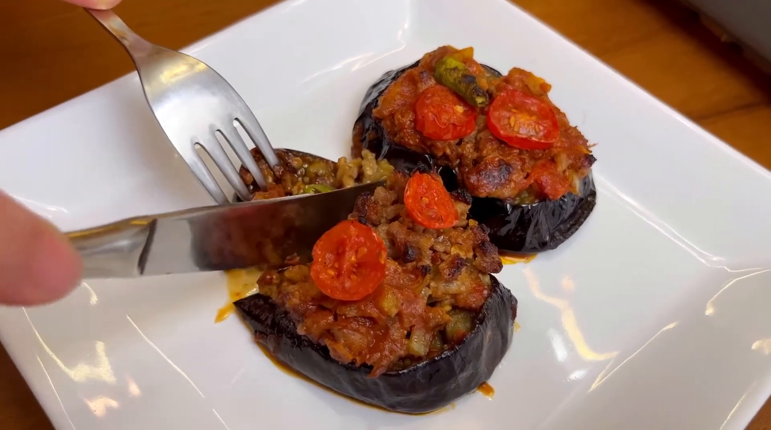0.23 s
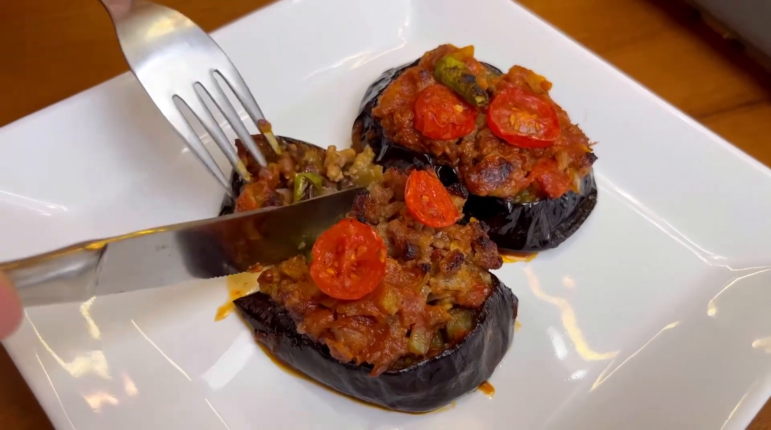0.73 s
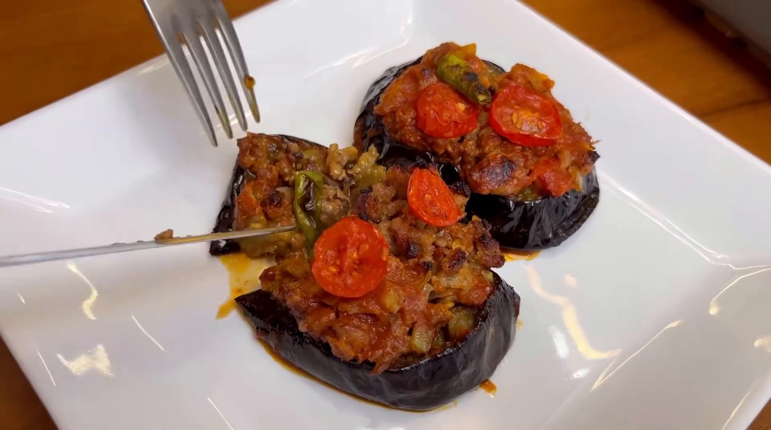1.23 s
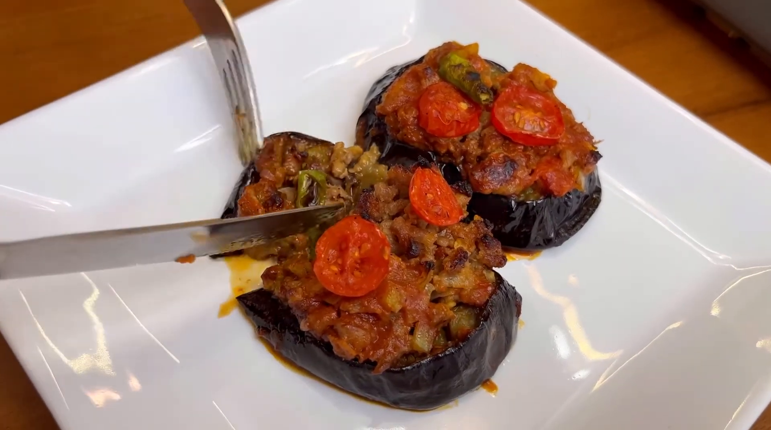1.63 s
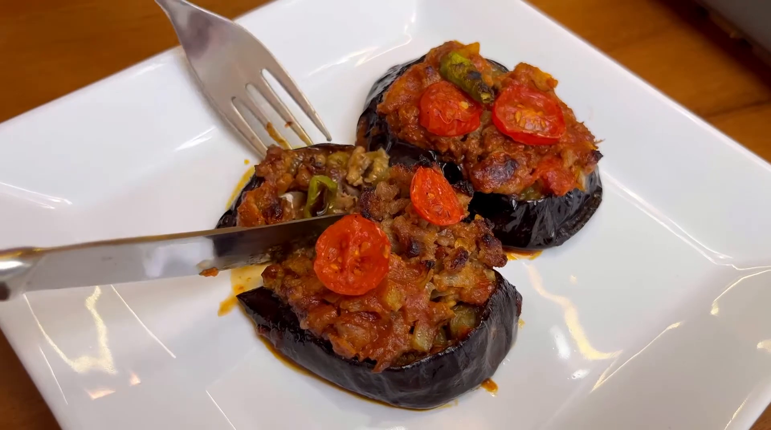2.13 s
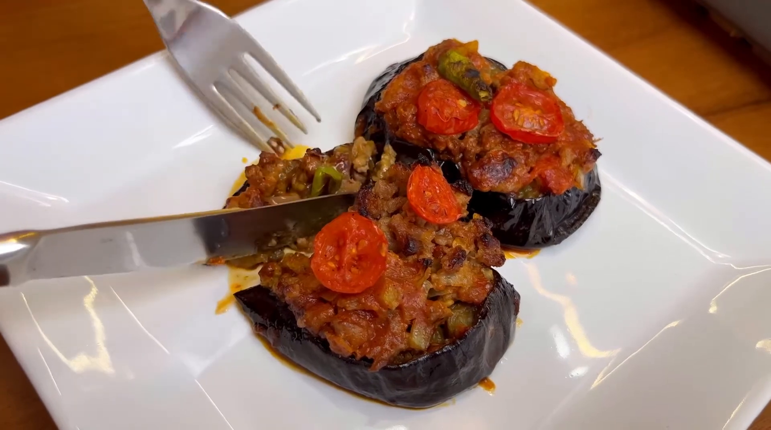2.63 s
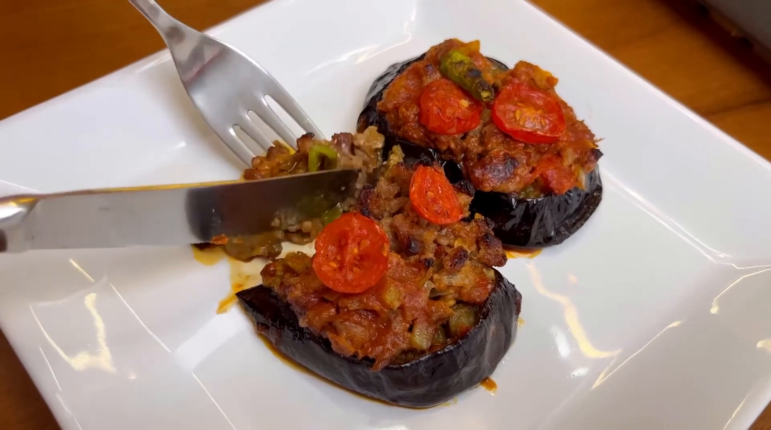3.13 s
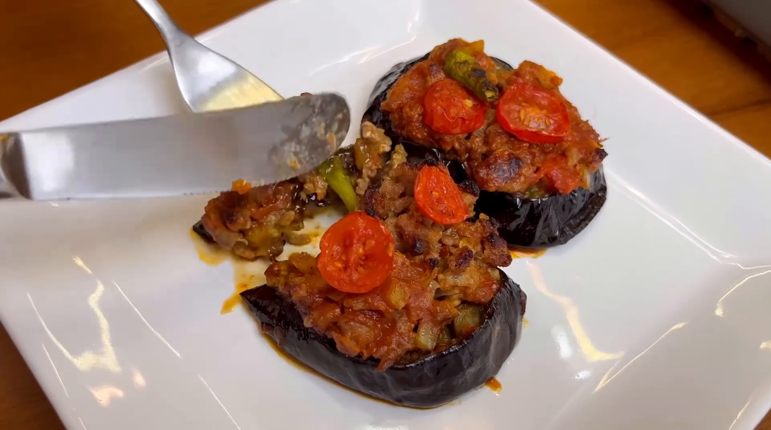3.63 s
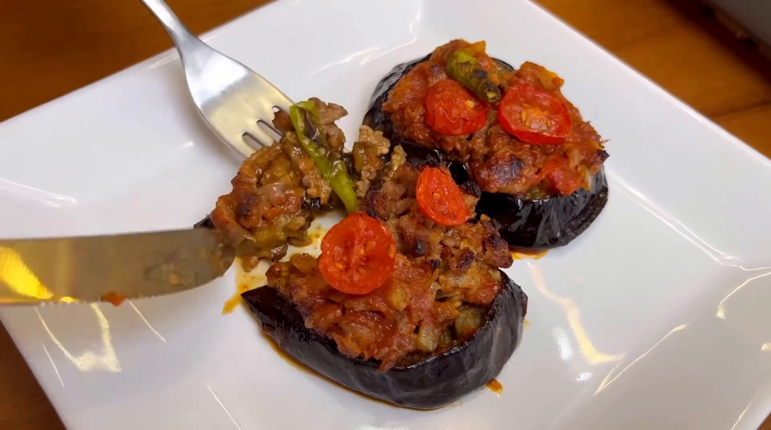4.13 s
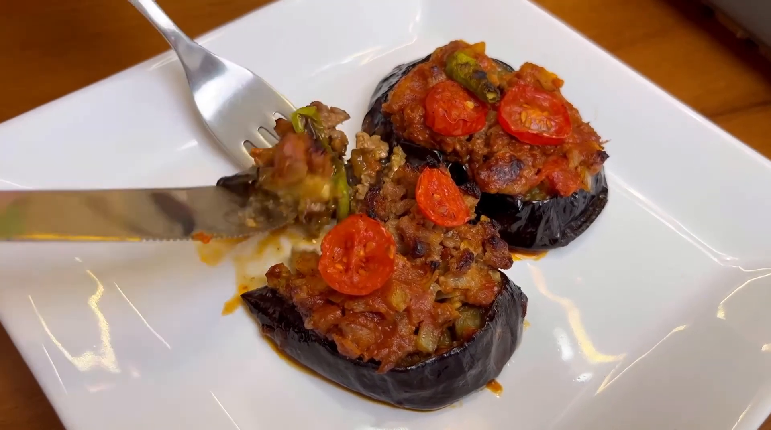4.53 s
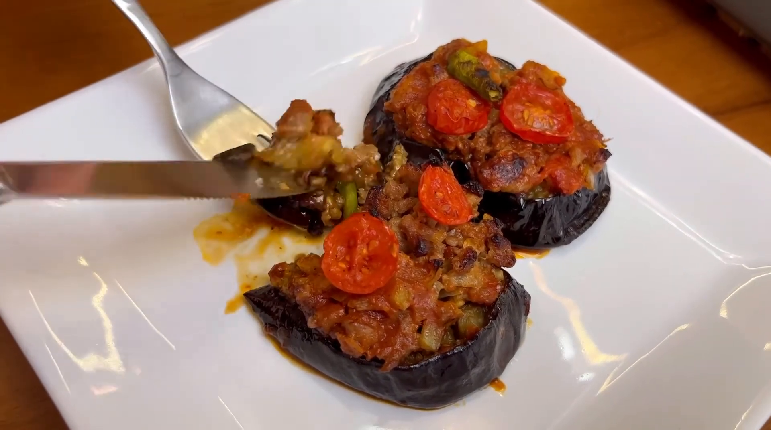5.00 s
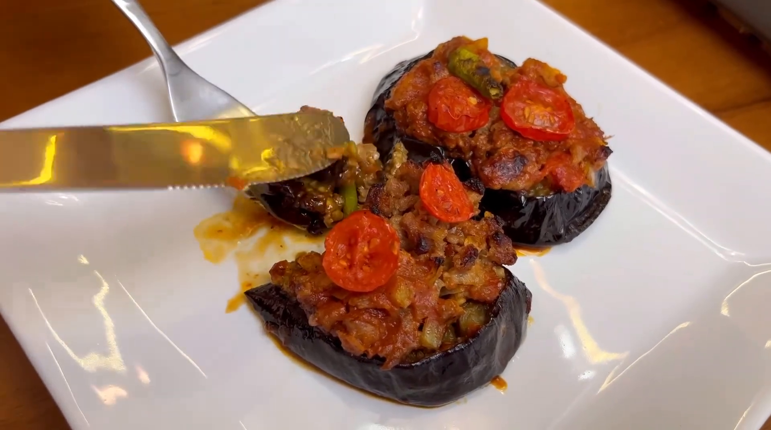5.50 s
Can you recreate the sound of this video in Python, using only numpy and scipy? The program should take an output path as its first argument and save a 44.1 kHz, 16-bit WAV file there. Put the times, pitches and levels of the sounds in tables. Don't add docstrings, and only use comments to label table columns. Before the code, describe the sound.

Steel cutlery on a plate of soft food, heard very near. Stuttering knife scrape and knock come first, then a pause, a quick fork squeak with a clink, sticky little snaps and a muffled saw stroke. The loudest event follows, a bright high ringing clink with a fast decay. Afterwards only tiny moist clicks over a distant low rumble and steady hiss in a quiet indoor room.

```python
import sys
import numpy as np
from scipy import signal
from scipy.fft import rfft, irfft, next_fast_len
from scipy.io import wavfile
from scipy.ndimage import uniform_filter1d, minimum_filter1d

SR = 44100
rng = np.random.default_rng(int(sys.argv[2]) if len(sys.argv) > 2 else 0)


def wav_record(signal):
    frames = np.transpose(np.atleast_2d(signal))
    bounded = np.clip(frames, -1, 1)
    quanta = np.round(bounded * 32767).astype(np.int16)
    wavfile.write(sys.argv[1], SR, quanta)


def field_ratio(decibels):
    return 10 ** (np.asarray(decibels, dtype=float) / 20)


N = 254008

KNIFE_HZ = [318, 587, 999, 1155, 1260, 1985, 2078, 2398, 2479, 2960, 3292, 3408, 3596, 4541, 4632, 4923,
            5181, 5292, 5696, 6105, 6239, 6498, 8390, 8662, 2549, 2828, 3159, 3258, 3358, 3525, 4233, 4873,
            5146, 5239, 5352, 5576, 7087, 7823]
FORK_HZ = [205, 322, 385, 452, 587, 996, 1157, 1529, 1776, 2078, 2261, 3219, 3359, 3474, 4368, 4939, 5211,
           5628, 5771, 6807, 7418, 7827, 9259, 9580, 9876, 10516, 11012, 11332, 11544, 11768, 2924, 3062,
           3284, 4771, 5362, 5542, 6407, 6512, 6955, 7215, 7284, 7651, 9103]
RIM_HZ = [248, 460, 587, 1155, 1300, 1527, 1615, 1986, 2078, 2213, 2549, 3467, 3610, 4363, 4802, 4931, 5206,
          5560, 5603, 5655, 6099, 6199, 7407, 7490, 7650, 8659, 8780, 10026, 11009, 11930, 3408, 3529, 3565,
          3772, 4044, 4194, 4465, 4665, 5257, 5344, 5508, 6591, 7211, 8391, 10166, 2929, 6800]
# level in dB, t60 in seconds.
KNIFE_RINGS = [(-50, 0.4), (-62.5, .16), (-51.5, 0.46), (-44, 0.24), (-41, 0.14), (-40.5, 0.088),
               (-43, 0.35), (-47.5, 0.19), (-44.5, 0.21), (-44.5, 0.17), (-39, 0.11), (-46, 0.32),
               (-47.5, 0.38), (-58, 0.2), (-61, 0.13), (-52, 0.176), (-51, 0.21), (-51.5, 0.19),
               (-63, 0.18), (-67.5, .18), (-66, 0.17), (-55, 0.12), (-67, 0.189), (-72, 0.08), (-47, .2),
               (-56.5, .2), (-52.5, .2), (-46.5, 0.3), (-43.5, .3), (-55.5, 0.13), (-61, .2), (-51.5, .2),
               (-58, .2), (-54, 0.17), (-57.5, .2), (-60, .2), (-72, .17), (-71.5, 0.19)]
FORK_RINGS = [(-55.5, 0.23), (-44.5, 0.79), (-52, 0.22), (-48.5, 0.24), (-49.5, 0.23), (-48.5, 0.28),
              (-39.5, 0.13), (-48.5, 0.12), (-52, .33), (-64, .32), (-62.5, .25), (-41.5, .12), (-38, .2),
              (-38, 0.23), (-42.5, 0.26), (-48, 0.46), (-40.5, 0.32), (-38, 0.28), (-40.5, 0.21),
              (-50, 0.062), (-42, 0.11), (-54, 0.25), (-45.5, .063), (-33.5, 0.043), (-56, 0.19),
              (-57, 0.21), (-49, 0.15), (-45.5, 0.14), (-44.5, .16), (-46.5, .17), (-59, .3), (-55, .3),
              (-48.5, .3), (-54.5, .3), (-55, .22), (-50, 0.25), (-55, .15), (-56.5, .2), (-57, .25),
              (-59.5, 0.18), (-53, .2), (-58.5, .22), (-54, 0.19)]
RIM_RINGS = [(-42, .16), (-41.5, .2), (-45, 0.16), (-34.5, 0.18), (-37, .25), (-39.5, 0.55), (-32, .15),
             (-27, .2), (-29.5, .2), (-24.5, 0.27), (-39, .41), (-25.5, .22), (-28, 0.18), (-28.5, .23),
             (-33.5, .15), (-22, .22), (-33.5, .16), (-29, 0.053), (-28.5, 0.15), (-25, .19), (-28.5, .19),
             (-34.5, .22), (-26, .2), (-33.5, 0.36), (-33.5, .16), (-39, 0.46), (-27, .23), (-37, .12),
             (-34, 0.21), (-50, 0.35), (-35, .25), (-32, .25), (-30, .25), (-39, .25), (-39, .35),
             (-40.5, .3), (-41.5, .3), (-45, .3), (-40, .28), (-43, .28), (-38, .25), (-37, .25),
             (-42.5, .22), (-44.5, .3), (-44.5, .25), (-51.5, .5), (-46.5, 0.25)]
# frequency in Hz, density in dB per Hz.
CRACKS = [
    [(120, -35), (200, -19), (704, -29), (1200, -4.5), (1670, -38), (2050, -3.5), (2750, -33.5), (3260, 7),
     (4150, -29.5), (5290, -15.5), (7330, -31), (10500, -35.5), (12300, -61), (16000, -100), (22000, -120)],
    [(120, -40.5), (200, 1.5), (1180, -14), (1610, -19.5), (2160, 8), (2790, -19), (3380, 4), (4010, -25.5),
     (4300, -0.5), (5660, -8), (7590, -9.5), (8420, -27), (12300, -3.5), (16000, -43), (22000, -120)],
    [(120, -48.5), (200, -16), (851, -21), (2120, -1.5), (2990, -21), (3500, -2), (3940, -19.5),
     (4850, -3.5), (6500, -17.5), (7460, -1.5), (8130, -19.5), (11300, -24), (12300, -38), (16000, -65.5),
     (22000, -120)],
]
# start in seconds, early ring in dB, early t60 in seconds, crack in dB.
KNOCKS = [
    (0.6236, 17.5, 0.028, -23.5),
    (2.579, 13, 0.041, -22.5),
    (4.217, -4.5, 0.062, -13),
]
# delay in seconds, level in dB.
BOUNCES = [
    (.004, 0.5),
    (.008, -4),
    (.0095, -1),
]
# time in seconds, pressure in dB, brightness in dB.
STROKES = [
    [(0.0, -43, -13), (0.045, -82, -22), (0.075, -59, -30), (0.114, -54.5, -27.5), (0.188, -72.5, -9),
     (0.222, -78.5, -29), (0.262, -66.5, -31), (0.298, -51.5, -19), (0.46, -89.5, -42)],
    [(2.7, -79.5, 6.5), (2.754, -83, -9.5), (2.862, -62.5, -18), (2.906, -78.5, -14), (2.946, -62, -30.5),
     (3.04, -102, 1)],
]
# frequency in Hz, width in Hz, level in dB.
PLATE = [(1190, 58, 6), (2008, 20, 4), (2515, 20, -2.5), (3150, 100, -2.5), (3438, 49, -8.5),
         (4617, 53, -15), (5200, 46, -11.5), (6760, 110, -13.5), (8300, 97, -21.5), (11300, 190, -27)]
SAUCE = [(2062, 110, -5), (3080, 120, -14.5), (4930, 27, -15.5), (7160, 74, -14.5), (8700, 94, -37),
         (9800, 88, -32), (9900, 24, -23), (11250, 67, -10)]
# time in seconds, level in dB, brightness in dB.
SKID = [(2.224, -76, -5), (2.236, -52, -5.5), (2.246, -46, -11.5), (2.264, -41.5, -22), (2.285, -47.5, -22),
        (2.31, -52, -24), (2.345, -65, -30), (2.42, -91, -38)]
# frequency in Hz, width in Hz, level in dB.
TINES = [(1341, 27, 1.5), (2412, 95, -2), (3020, 36, -8), (3760, 61, -3), (4114, 90, -2.5),
         (5430, 52, -12.5), (6140, 23, -24), (7250, 39, -22.5), (8400, 130, -16), (10950, 110, -33)]
# frequency in Hz, density in dB per Hz.
FRICTION_HISS = [(120, -25), (200, -5.5), (732, -11.5), (886, -3.5), (966, -6), (1360, -5), (1900, -9),
                 (2330, -5.5), (3990, -9), (12500, -34), (16200, -68), (22000, -120)]
# start in seconds, peak in dB, strongest ring in Hz.
NUDGES = [(0.001, -40, 3030), (0.0664, -56, 1290), (0.0877, -62, 2130), (0.1201, -45.5, 1190),
          (0.1181, -41, 2050), (0.164, -45, 1860), (0.2615, -55, 1199), (0.273, -55, 2000),
          (0.3013, -33, 1216), (0.3004, -54.5, 3070), (0.33, -51, 1256), (0.355, -53, 1290),
          (0.3694, -43, 2075), (2.83, -54.5, 1210), (2.859, -67, 2111), (2.939, -54, 2040)]
# start in seconds, peak in dB, pitch in Hz, top band in dB.
TICKS = [(0.158, -49, 9300, -80), (0.293, -65, 6900, -67.5), (0.536, -58, 6700, -93),
         (0.7197, -74, 5660, -80), (0.743, -75, 7600, -75), (0.755, -65, 7800, -88),
         (1.53, -95, 5430, -87.5), (2.1564, -66, 6520, -102), (2.189, -58, 6200, -99),
         (2.2193, -62, 6650, -98), (2.445, -43.5, 8200, -70), (2.458, -52, 8310, -78),
         (2.466, -74, 7500, -76), (2.4804, -64, 8300, -89), (2.4962, -50.5, 8000, -82),
         (2.5046, -52, 6860, -90), (2.5124, -62, 8210, -84), (3.033, -66, 7000, -100),
         (3.0407, -66, 7300, -100), (3.105, -44.5, 5950, -79), (3.249, -71.5, 5640, -88),
         (3.41, -83.5, 6170, -83), (3.4906, -72.5, 7740, -75.5), (3.506, -63, 6950, -77),
         (4.8094, -69, 8020, -85), (4.8792, -64, 7740, -68), (4.95, -53, 8700, -60.5),
         (4.9709, -48, 6530, -86), (5.6494, -72.5, 5690, -84)]
# start in seconds, peak in dB, pitch in Hz, top band in dB.
SMACKS = [(2.9529, -60.5, 7650, -99), (2.954, -75, 5050, -99), (2.99, -83, 8430, -86),
          (3.094, -78, 8060, -86), (3.1085, -70, 5200, -94)]
# frequency in Hz, t60 in seconds.
ROOM = [(250, 0.73), (1000, 0.3), (3000, 0.28), (6000, 0.24), (12000, 0.14)]
# frequency in Hz, lead in radians.
PORT_LEAD = [(300, 0.1), (1150, 0.6), (2070, 1.6), (3460, 3.9), (4920, 5.9), (6100, 9.4), (7400, 12.5),
             (11900, 18.8)]
# time in seconds, level in dB, hum frequency in Hz.
RUMBLE = [(0.0, -70, 63), (1.0, -58, 63), (2.0, -67, 64), (2.75, -62, 68), (3.3, -64, 62),
          (3.75, -56.5, 69.5), (4.8, -64, 70.5), (5.76, -59.5, 72)]
# frequency in Hz, level in dB.
AIR = [(56, -40), (95, -12), (101, -23), (129, -2.5), (167, -7), (201, -1.5), (283, -8), (327, -9.5),
       (677, -17), (1450, -16.5), (1650, -22), (3150, -35), (5500, -38.5), (12000, -58), (15600, -89),
       (22000, -120)]
# frequency in Hz, width in Hz, level in dB.
BOOMS = [(140, 14, 6), (205, 12, 7), (240, 14, 6), (322, 12, 6), (1100, 500, 3), (11200, 1000, 9),
         (9600, 900, -8)]
# frequency in Hz, correlation from 0 to 1.
SAME = [(60, 0.98), (150, 0.85), (360, 0.6), (870, 0.15), (2120, 0.3), (5170, 0.17), (12600, 0.1)]

LEAD = 0.03


def evened(x):
    return x / np.sqrt(np.mean(x ** 2) + 1e-20)


def read(points, hz):
    f, value = np.transpose(points)
    return np.interp(np.log(hz + 1), np.log(f + 1), value)


def curves(rows):
    s, *columns = np.transpose(rows)
    span = slice(round(s[0] * SR), min(round(s[-1] * SR), N))
    times = np.arange(N)[span] / SR
    return span, [np.interp(times, s, c) for c in columns]


def add(mix, s, sound):
    part = mix[:, max(round(s * SR), 0):][:, :sound.shape[-1]]
    part += sound[..., :part.shape[1]]


def resonate(x, hz, width):
    turn = np.exp(2j * np.pi * np.cumsum(hz * np.ones(x.shape[-1])) / SR)
    r = np.exp(-np.pi * width / SR)
    return 2 * (turn * signal.lfilter([1 - r], [1, -r], x / turn + 1e-18)).real


def coloured(x, points):
    size = x.shape[-1]
    gain = field_ratio(read(points, np.fft.rfftfreq(size, 1 / SR)))
    return evened(irfft(rfft(x) * gain, size))


def pair(size, same):
    a, b = rng.standard_normal((size, 2)).T
    same = np.clip(same, -1, 1)
    return np.array([a, same * a + np.sqrt(1 - same ** 2) * b])


def knock(pitches, modes, crack, bounce, early_db, early_t60, crack_db):
    rise_s, crack_t60, touch_db = 0.0026, 0.034, -26
    damping = 0.6
    twin_db, twin_spread = -13, 0.016
    pan_db, lead_rad = 5, 0.5
    t = np.arange(SR // 2) / SR - LEAD
    after, again = np.maximum(t, 0), np.maximum(t - bounce[0], 0)
    rebound = field_ratio(bounce[1]) * np.clip(again / rise_s, 0, 1) ** 2
    burst = field_ratio(-60 * after / crack_t60) + rebound * field_ratio(-60 * again / crack_t60)
    snap = field_ratio(crack_db) * burst * coloured(pair(len(t), 0.28), crack)
    early = field_ratio(early_db) * (field_ratio(-60 * after / early_t60) + rebound * field_ratio(-60 * again / early_t60))
    chance = rng.uniform(-1, 1, (60, 4, 4))
    side = np.array([[.5], [-.5]])
    out = 0
    for hz, (db, t60), (own, *twins) in zip(pitches, modes, chance):
        fade = field_ratio(db - 60 * after / (damping * t60)) * (1 + early)
        lead = lead_rad * own[1]
        ring = np.sin(2 * np.pi * hz * t + np.pi * own[0] + side * lead)
        for offset, size, phase, turn in twins:
            cycles = hz * (1 + twin_spread * offset) * t + phase / 2
            twin = np.sin(2 * np.pi * cycles + side * (lead + turn))
            ring += field_ratio(twin_db + 4.3 * size - 12 * after / t60) * twin
        out = out + fade * field_ratio(side * pan_db * own[2]) * ring
    onset = np.clip(t / rise_s, 0, 1) ** 2
    touch = field_ratio(touch_db + 1600 * np.minimum(t, 0))
    return np.array([out, snap]) * (onset + touch)


def scrape(rows, modes, hiss_db, grit_db, per_s, blur, wander_db, smear):
    span, (db, bright_db) = curves(rows)
    luck, size = rng.random(N)[span], rng.exponential(1, N)[span]
    noise = pair(N, 0.13)[:, span]
    slips = field_ratio(grit_db * np.minimum(size, 3)) * (luck < per_s / SR)
    grit = noise * (0.91 + evened(signal.lfilter([1], [1, -.99], slips)))
    t, rings = np.arange(len(db)) / SR, 0
    for (f, w, d), (pace, phase) in zip(modes, rng.random((len(modes), 2))):
        share = field_ratio(d + wander_db * np.sin(2 * np.pi * ((4 + 9 * pace) * t + phase)))
        width = blur * w + smear * f
        rings = rings + share * evened(resonate(resonate(grit, f, width), f, 2 * width))
    body = evened(rings) + field_ratio(hiss_db) * coloured(grit, FRICTION_HISS)
    top = signal.sosfiltfilt(signal.butter(2, 6200 / SR * 2, "high", output="sos"), body)
    sound = field_ratio(db) * (evened(body - top) + field_ratio(bright_db) * evened(top))
    return span.start / SR, sound * signal.windows.tukey(len(db), .08)


def nudge(db, hz):
    t = np.arange(SR // 10) / SR
    out = np.zeros((2, len(t)))
    for f, _, mode_db in [(hz, 0, 8.)] + PLATE:
        near_db = 1.8 * mode_db - 7 * abs(np.log2(f / hz))
        phase = rng.uniform(0, 2 * np.pi) + rng.normal(0, 0.36, (2, 1))
        out += field_ratio(near_db - 60 * t / 0.031) * np.sin(2 * np.pi * f * t + phase)
    return field_ratio(db) * out / abs(out).max() * np.minimum(t / .0016, 1)


def tick(db, hz, top_db, body_db):
    t = np.arange(SR // 100) / SR
    snap = pair(len(t), 0.94) * np.exp(-t / 0.0013) * np.minimum(t / 0.000067, 1)
    low_db = max(db, top_db + 12.5) + body_db
    out = 0
    for d, f, w in [(db, hz, 2600.), (top_db + 12.0, 11300, 1500.), (low_db, 3400, 5000.)]:
        ring = resonate(resonate(snap, f, w), f, w)
        out = out + field_ratio(d) * ring / abs(ring).max()
    return out


def room(x):
    taps = np.zeros((2, SR // 2))
    slots = np.arange(150, SR // 2 - 20, 20)
    at = slots + rng.integers(0, 20, (2, len(slots)))
    np.put_along_axis(taps, at, rng.choice([-1., 1.], at.shape), 1)
    hz, t, z = signal.stft(taps, SR, nperseg=256)
    decay = field_ratio(-60 * t / read(ROOM, hz)[:, None])
    tail = signal.istft(z * decay, SR, nperseg=256)[1]
    return signal.fftconvolve(x, tail / np.linalg.norm(tail[0]), axes=1)[:, :N]


def ports(x):
    size = next_fast_len(N)
    lead = read(PORT_LEAD, np.fft.rfftfreq(size, 1 / SR))
    x = irfft(rfft(x, size) * np.exp(1j * lead * np.array([[.5], [-.5]])), size)[:, :N]
    mid, side = x.mean(0), (x[0] - x[1]) / 2
    side = signal.sosfiltfilt(signal.butter(1, 350 / SR * 2, "high", output="sos"), side)
    return np.array([mid + side, mid - side])


def rumble():
    boom_hz, boom_width, boom_db = 58.0, 15, -63.5
    span, (db, hz) = curves(RUMBLE)
    noise, draught = pair(N, 1.0)[:, span], pair(N, 0.94)[:, span]
    hum = resonate(resonate(noise, hz, 6.0), hz, 12.0)
    hum /= np.sqrt(uniform_filter1d(hum[0] ** 2, size=14000))
    boom = evened(resonate(resonate(draught, boom_hz, boom_width), boom_hz, 2 * boom_width))
    skirt = evened(resonate(resonate(noise, 43.0, 49.0), 43.0, 49.0))
    return span.start / SR, field_ratio(db) * hum + field_ratio(boom_db) * boom + field_ratio(-74.0) * skirt


def air():
    air_db, sway_db, fade_db = -61, -3.5, -2
    lag_s, shade_db = .00025, -3
    hop = 512
    frames, hz = N // hop + 6, np.fft.rfftfreq(4 * hop, 1 / SR)
    a, b, c, d, patches = rng.standard_normal((frames, len(hz), 5)).T
    patches = evened(uniform_filter1d(uniform_filter1d(patches, size=12, axis=0), size=8, axis=1))
    low_db = sway_db * evened(uniform_filter1d(rng.standard_normal(frames), size=30))
    middle_db = fade_db * (np.arange(frames) / frames - .5)
    shape_db = read(AIR, hz) + sum(db / (1 + (2 * (hz - f) / w) ** 2) for f, w, db in BOOMS)
    low = 1 / (1 + (hz[:, None] / 450) ** 2)
    same, left = np.clip(read(SAME, hz), -1, 1)[:, None], a + 1j * b
    z = np.array([left, same * left + np.sqrt(1 - same ** 2) * (c + 1j * d)])
    shade = field_ratio(shade_db / (1 + (3500 / (hz + 1)) ** 2))
    z[0] *= (np.exp(-2j * np.pi * hz * lag_s) * shade)[:, None]
    z *= field_ratio(shape_db[:, None] + 2.1 * patches + low * low_db + (2.5 - low) * middle_db)
    hiss = signal.istft(z, nperseg=4 * hop, noverlap=3 * hop)[1][:, :N]
    return field_ratio(air_db + 1.5) * evened(hiss)


def scene():
    steel, cracks, small, floor = np.zeros((4, 2, N))
    bodies = (KNIFE_HZ, KNIFE_RINGS), (FORK_HZ, FORK_RINGS), (RIM_HZ, RIM_RINGS)
    for (s, *blow), body, crack, bounce in zip(KNOCKS, bodies, CRACKS, BOUNCES):
        ring, snap = knock(*body, crack, bounce, *blow)
        add(steel, s - LEAD, ring)
        add(cracks, s - LEAD, snap)
    add(steel, *scrape(STROKES[0], PLATE, hiss_db=-6., grit_db=3., per_s=500., blur=2.5,
                       wander_db=4., smear=.045))
    add(steel, *scrape(STROKES[1], SAUCE, hiss_db=-14, grit_db=3., per_s=400., blur=3.,
                       wander_db=4., smear=.06))
    add(steel, *scrape(SKID, TINES, hiss_db=3., grit_db=2.2, per_s=900., blur=1.8,
                       wander_db=5., smear=.014))
    for s, *row in NUDGES:
        add(small, s, nudge(*row))
    for s, *row in TICKS:
        add(small, s, tick(*row, body_db=-11))
    for s, *row in SMACKS:
        add(small, s, tick(*row, body_db=19))
    add(floor, *rumble())
    echo = room(field_ratio(-8.5) * (steel + field_ratio(-9) * cracks) + field_ratio(-9.5) * small)
    return ports(steel + cracks + small + echo) + floor + air()


def thinned(x):
    valley_db, line_db, drop_db = 8.5, 19, -25
    hz, _, z = signal.stft(x, SR, nperseg=1024, noverlap=768)
    energy = (abs(z) ** 2).sum(0)
    power = uniform_filter1d(uniform_filter1d(energy, size=7, axis=0), size=5, axis=1)
    db = 10 * np.log10(abs(power) + 1e-20)
    top = -minimum_filter1d(-db, size=13, axis=0)
    under = np.minimum(np.roll(top, 9, 0), np.roll(top, -9, 0)) - db - valley_db
    fine_db = 10 * np.log10(abs(uniform_filter1d(energy, size=3, axis=1)) + 1e-20)
    under = np.maximum(under, top - fine_db - line_db)
    gain = field_ratio(drop_db * np.clip(under / 2, 0, 1) * (hz[:, None] > 3300))
    return signal.istft(z * gain, SR, nperseg=1024, noverlap=768)[1][:, :N]


def low_pass(x):
    return signal.sosfilt(signal.butter(12, 13210, fs=SR, output="sos"), x)


def record(dry):
    edge = signal.firwin(511, 12050, window=("kaiser", 8), fs=SR)
    mix = signal.oaconvolve(thinned(dry), edge[None], "same")
    return low_pass(mix)


dry = scene()
out = record(dry)
wav_record(out)
```